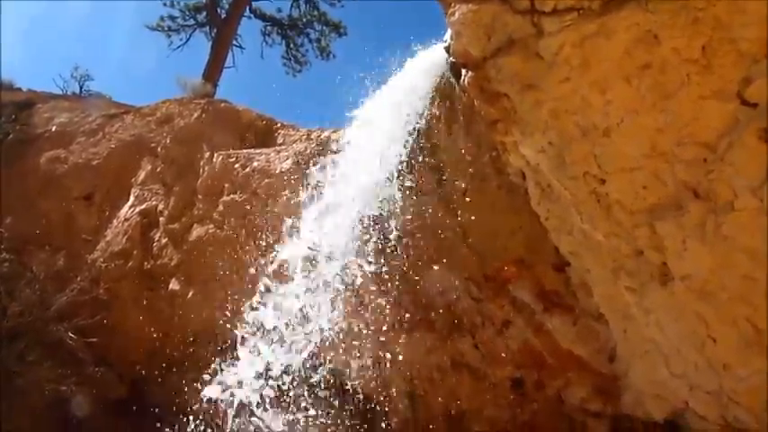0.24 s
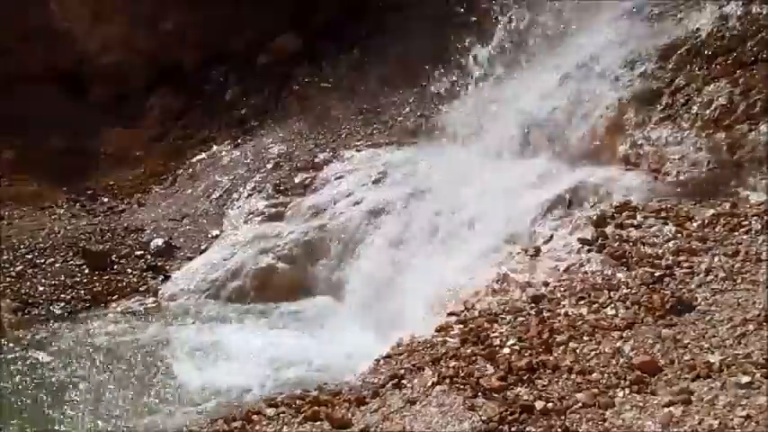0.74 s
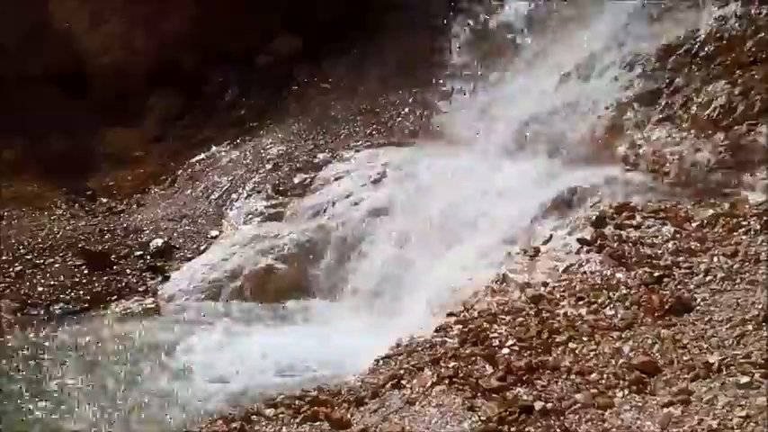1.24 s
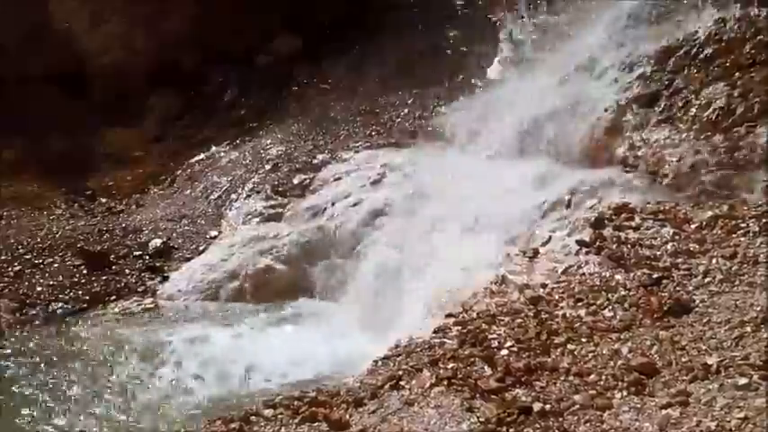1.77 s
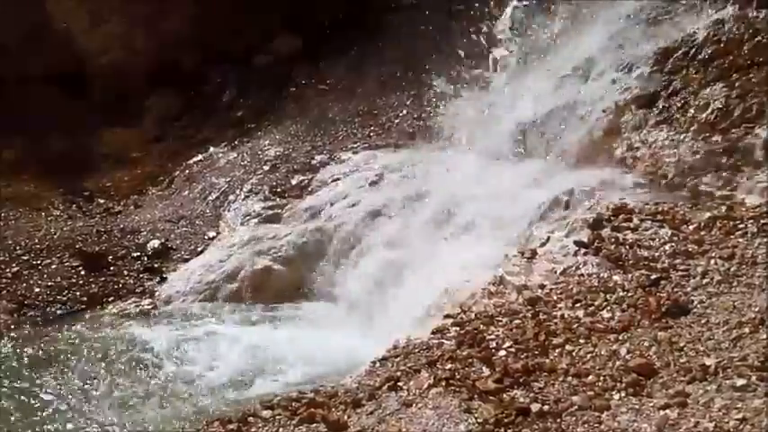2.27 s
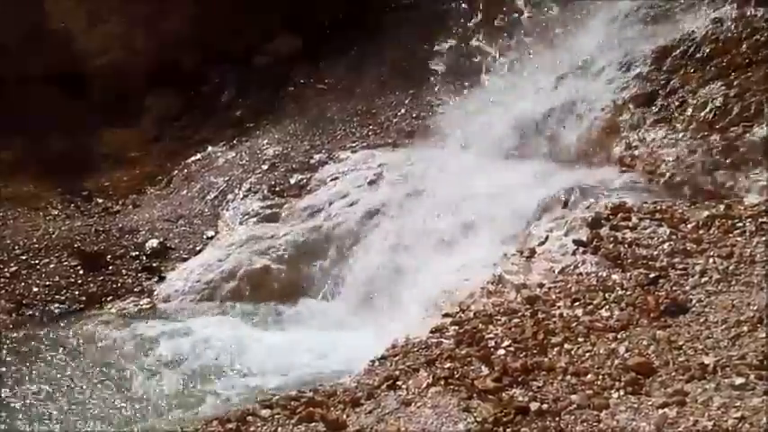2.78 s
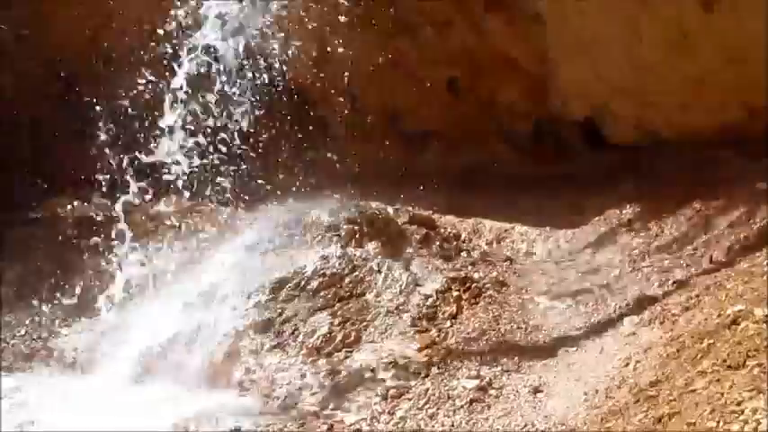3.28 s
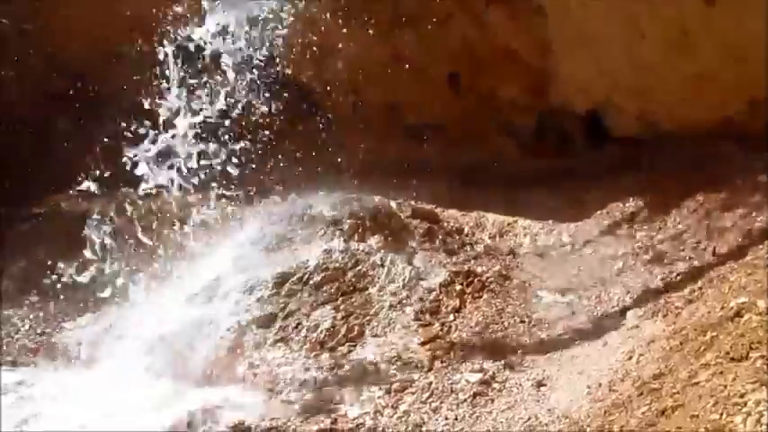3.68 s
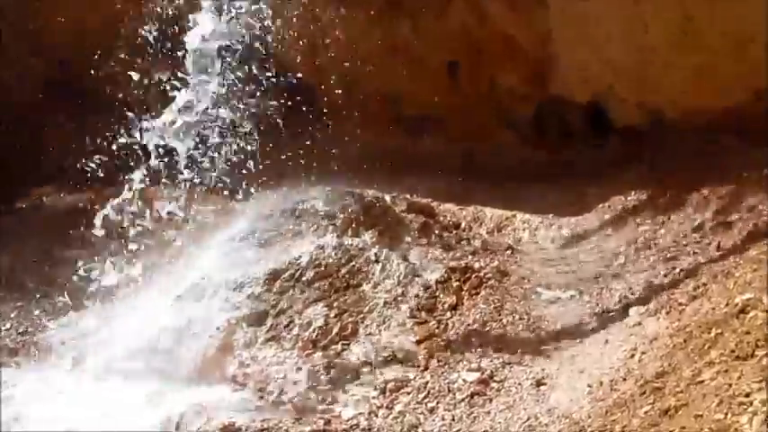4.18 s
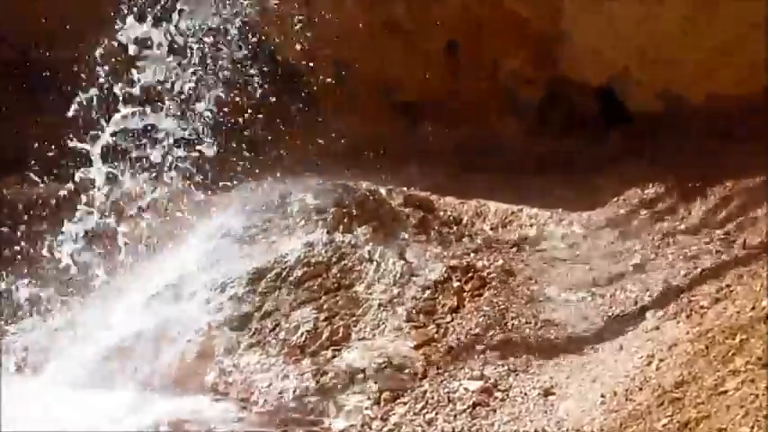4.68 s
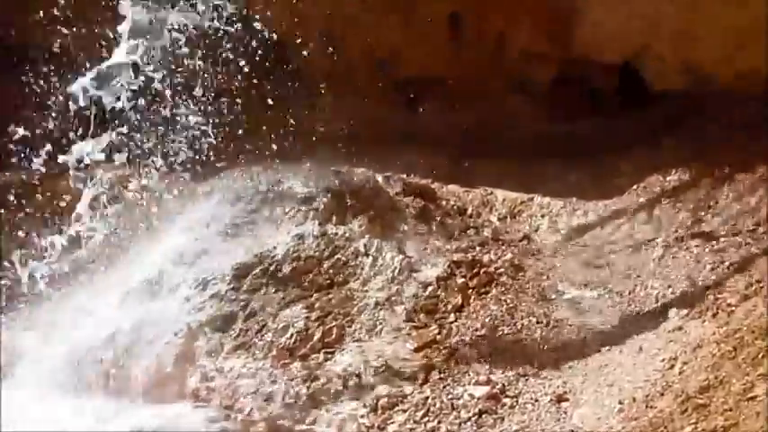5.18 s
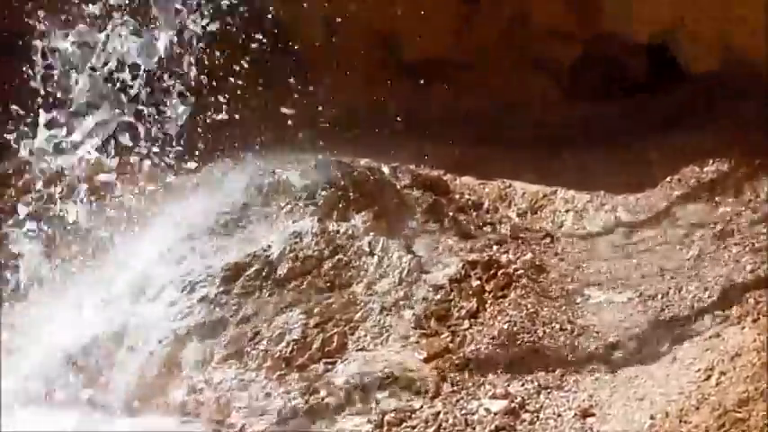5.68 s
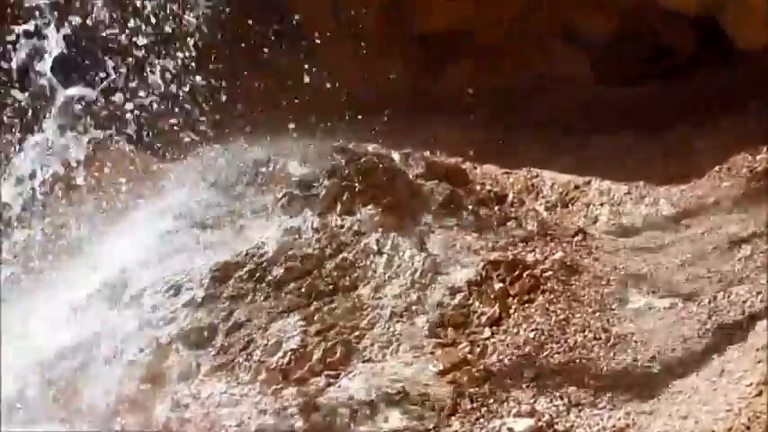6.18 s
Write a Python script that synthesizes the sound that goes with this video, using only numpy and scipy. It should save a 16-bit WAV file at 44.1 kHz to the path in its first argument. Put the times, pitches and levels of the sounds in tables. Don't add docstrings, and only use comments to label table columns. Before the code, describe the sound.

From 0 to 0.47 s, water pours off a rock ledge with a rough, patchy roar, wind thudding low on the microphone. It cuts to complete silence until about 0.65 s. Then a second close position bursts in: bright, hissing water rushing down gravel into a pool, with quick surges and dips. Wind buffets in short low puffs, stronger at left, and from about 1 s fat drops smack stone with short wet plips, joined by a few spray ticks after 2 s. At 3.08 s it stops abruptly, silent until 3.25 s. The third position is sheltered, with no wind: a fuller, mid-heavy splashing, less airy, swelling at the start and again near 5.55 s. Irregular drop slaps come several times a second, with sharp little clicks to either side, a bright one around 5.2 s. The rush continues steadily to the end at 6.44 s, without fading.

```python
import sys
import numpy as np
from scipy import signal
from scipy.fft import rfft, irfft, next_fast_len
from scipy.io import wavfile
from scipy.ndimage import uniform_filter1d

SR = 44100
rng = np.random.default_rng(int(sys.argv[2]) if len(sys.argv) > 2 else 0)


def master(y):
    cut = np.clip(np.atleast_2d(y).T, -1, 1)
    pcm = np.round(cut * 32767)
    wavfile.write(sys.argv[1], SR, pcm.astype(np.int16))


def undo_db(level):
    steps = np.asarray(level, float) / 20
    return 10 ** steps


N = 283563

# start in seconds, end in seconds, notch depth [0-1].
SPOTS = [
    (0, .4695, .9),
    (.6462, 3.0838, .9),
    (3.2497, 6.44, 0),
]
# time in seconds, flow in dB.
FLOW = [(0, 0), (.25, .5), (.46, 0), (.66, 2), (.78, -0.5), (.9, 1), (1.06, -.5), (1.3, -1), (1.55, .5),
        (2.0, 0), (2.5, 0), (3.06, -1.5), (3.26, 1.5), (3.75, 1.5), (4.15, -1), (4.7, 1), (5.8, -.5),
        (6.43, 1)]
# time in seconds, gain in dB,
# landing [-1 pool, 0 rock, 1 thin spray].
SLUGS = [(.16, -1.5, -1), (.25, 3, -0.17), (.44, 3, -1), (.665, 3.5, 1.1), (.85, 3.5, -.7), (1.26, -4, .4),
         (1.38, 0.5, -.8), (1.47, 2.5, -0.12), (2.04, -4, -0.53), (2.38, -3, 1), (2.5, 1.5, -1),
         (2.59, -5.5, -0.85), (2.65, 0.5, 0), (2.78, 3.5, 0.57), (2.86, -2.5, -.5), (2.91, 3, -0.15),
         (3.42, 4.5, -1.4), (3.81, -3.5, -0.79), (3.9, 2, 0.48), (4.1, -3.5, -.4), (4.14, 2.5, -.8),
         (5.04, 1.5, -1.1), (5.33, 0.5, 0.58), (5.41, -2.5, -0.44), (5.55, 5.5, -1), (5.62, 2.5, 0.39),
         (5.83, 2, 0.24), (5.87, -1.5, 0), (6.09, 3.5, 0.63), (6.37, 2, -0.73)]
FLOW_SHARES = (0.9, 0.78, 1)
# splash in dB, plunge in dB, spray in dB.
FALLS_DB = [
    (-21.5, -30, -27.5),
    (-22, -30, -26),
    (-22.5, -29.5, -28.5),
]
# frequency in Hz, density in dB per Hz.
WATER_SPECTRA = [
    [(24, -57.5), (40, -33), (188, -11.5), (302, -14.5), (369, -11), (724, -7.5), (800, -6.5), (1030, -7),
     (2650, -5.5), (4050, -8), (9240, -19), (15600, -34)],
    [(24, -59.5), (40, -39), (218, -15), (342, -20.5), (564, -9.5), (742, -11), (1820, -4), (2860, -3.5),
     (5470, -8.5), (6040, -9.5), (7200, -10.5), (7950, -13), (9470, -15), (14500, -27), (15600, -31)],
    [(18, -65), (30, -39), (114, -18), (144, -20.5), (173, -12.5), (237, -13), (400, -14), (577, -7),
     (900, -8), (1370, -4), (2080, -1.5), (3420, -4), (5340, -14), (7900, -11.5), (15600, -28)],
]
# frequency in Hz, left minus right in dB.
PORT_TILTS = [
    [(500, 0), (700, 0.7), (1290, .1), (2380, -3), (4400, -2.5), (8120, 0.5), (15000, -1.5)],
    [(500, -0.2), (770, .6), (1790, -1.5), (2740, -3), (4190, -4), (6410, -1), (9810, -3), (15000, -1.1)],
    [(500, 0.3), (770, 1.3), (1790, -1.1), (2740, -2.1), (4190, .6), (6410, .1), (9810, -1), (15000, .6)],
]
# frequency in Hz, likeness [0-1], left port's lead in radians.
PORT_COHERENCE = [
    [(300, .95, 0), (1500, .88, 0), (2700, .66, 0), (4300, .35, .7), (7000, .22, 2.4), (10000, .45, 3),
     (15000, .2, 5.5)],
    [(300, .96, -.1), (1500, .87, -.45), (3500, .76, -.85), (5000, .64, -1.05), (9000, .52, -2),
     (12000, .42, -2.5), (15500, .33, -3.1)],
    [(300, .96, 0), (1300, .9, .1), (2000, .78, .2), (3700, .46, .9), (4300, .4, .5), (5800, .24, .8),
     (6800, .4, .7), (8200, .3, 2), (10000, .4, 2.8), (12500, .25, 3.2), (15500, .16, 4.2)],
]
# centre in Hz, width in Hz.
NOTCHES = [
    (5940, 110),
    (7850, 170),
]
# time in seconds, level in dB, hold in seconds, brightness in dB.
GUSTS = [(.005, -41, .005, 3.5), (0.195, -34.5, .005, 4.5), (.33, -46.5, .04, -5.5),
         (0.412, -40.5, .01, -6), (0.707, -46, 1.3, 2.5), (0.755, -34, .005, 3), (0.857, -35, .005, 5.5),
         (.97, -41, .02, -3), (1.079, -44, .08, 3.5), (1.274, -43.5, .02, 2), (1.382, -35.5, .01, 2),
         (1.46, -40.5, .05, -5.5), (1.562, -34, .005, 7), (1.656, -36.5, .005, 1),
         (1.787, -44.5, .02, -3.5), (1.86, -40, .02, 5.5), (1.954, -37.5, .01, 4.5), (2.04, -45, .005, 4.5),
         (2.129, -47, .005, -0.5), (2.23, -44.5, .18, -8.5), (2.841, -41, .01, -13), (2.95, -45.5, .05, -3),
         (3.045, -43, .01, -3)]
BREEZE_DB = (-50, -54.5)
LEAN_PER_DB = (0.3, 0.88)
# frequency in Hz, density in dB per Hz.
WIND_SPECTRUM = [(25, -16), (60, -0.5), (120, 0), (250, -8.5), (400, -10.5), (700, -27)]
# time in seconds, peak in dB, pitch in Hz.
SMACKS = [(0.96, -10, 3580), (0.9901, -11, 2380), (1.206, -11, 1797), (1.8252, -8, 2094), (1.914, -6, 2870),
          (2.0682, -8, 4090), (2.2025, -5, 2300), (2.3575, -5.5, 1954), (2.4039, -15, 2810),
          (2.5765, -12, 2490), (2.6086, -2.5, 3180), (2.904, -15.5, 2540), (3.0517, -10, 1990),
          (3.257, -10, 2490), (3.432, -9.5, 2300), (3.581, -9.5, 1390), (3.7495, -7.5, 1970),
          (3.9, -5, 2040), (4.029, -7, 2080), (4.125, -14, 2250), (4.4667, -3.5, 2760),
          (4.6556, -7.5, 2520), (4.7371, -7.5, 2680), (4.9057, -20, 1840), (5.2135, -10, 2350),
          (5.3312, -7.5, 2920), (5.6237, -3.5, 2180), (5.8315, -4.5, 1790), (6.2227, -11, 1470),
          (6.3596, -7.5, 1840)]
# time in seconds, peak in dB, left minus right in dB.
TICKS = [(2.0677, -11, -5), (2.7536, -9, 1), (2.7836, -9.5, 0), (3.247, -11.5, 1), (3.4357, -10.5, -2),
         (4.007, -8, -2.5), (4.197, -8.5, -4.5), (4.4163, -12, -2), (4.8307, -16.5, 4), (5.219, -5.5, 5.5),
         (5.5797, -13.5, 3), (5.884, -15, -4.5)]


def rms_one(x):
    return x / np.sqrt(np.mean(x ** 2) + 1e-20)


def in_time(rows):
    s, *columns = np.transpose(rows)
    return [np.interp(np.arange(N) / SR, s, c) for c in columns]


def at_hz(points, hz):
    points_hz, values = np.transpose(points)
    return np.interp(np.log(hz), np.log(points_hz), values)


def drift(rate):
    step = 20
    r = np.exp(-2 * np.pi * step * rate / SR)
    noise = rng.standard_normal(N // step + 4002)
    slow = signal.lfilter([1], [1, -2 * r, r * r], noise)[4000:]
    return np.interp(np.arange(N) / step, np.arange(len(slow)), rms_one(slow))


def band(x, low_hz, high_hz):
    return signal.sosfilt(signal.butter(2, [low_hz, high_hz], "band", fs=SR, output="sos"), x)


def flow():
    churn_db, churn_per_s = (0.2, .5, 0.38), 14
    half_s, spread = 0.019, 1
    t = np.arange(N) / SR
    landings = np.array([[0], [-1], [1]])
    out = np.outer(FLOW_SHARES, in_time(FLOW)) + [db * drift(churn_per_s) for db in churn_db]
    for s, gain_db, landing in SLUGS:
        near = slice(*np.searchsorted(t, [s - 3 * half_s, s + 3 * half_s]))
        aim = ((landings - landing) / spread) ** 2
        passing = ((t[near] - s) / half_s) ** 2
        out[:, near] += gain_db * np.exp(-aim - passing)
    return out


def drops(per_cycle, size_db, share, echo_share, patchy_db, surge_db):
    out, surge, neighbour = np.zeros((3, N)), drift(12), drift(14)
    edges = 24 * 2 ** np.arange(0, 9.6, .5)
    shares = np.clip([[share], [echo_share], [echo_share]], 0, 1)
    white = rng.standard_normal((2, 3, N))
    chance = rng.random(N)
    sizes_db = size_db * np.minimum(rng.exponential(1, N), 4)
    sizes = undo_db(sizes_db) * rng.choice([-1, 1], N)
    for k, (low, high) in enumerate(zip(edges, edges[1:])):
        hits = rms_one(sizes * (chance < per_cycle * low / SR))
        hits = np.roll(hits, k * N // 23)
        echoed = [hits, np.roll(hits, N // 3), np.roll(hits, -N // 3)]
        mist = np.sqrt(1 - shares) * white[k % 2] + np.sqrt(shares) * echoed
        own = drift(17)
        out += band(mist, low, high) * undo_db(surge_db * surge + patchy_db * (own + neighbour))
        neighbour = own
    return out


def heard_from(streams, notch, colour, tilt, pair):
    size = next_fast_len(N)
    hz = np.maximum(np.fft.rfftfreq(size, 1 / SR), 1)
    direct, left, right = rfft(streams, size)
    at, likeness, lead = np.transpose(pair)
    alike = np.interp(hz, at, likeness)
    turn = np.interp(hz, at, lead) / 2
    gain = undo_db(at_hz(colour, hz)) / np.sqrt(1 + alike * np.cos(2 * turn))
    for notch_hz, width_hz in NOTCHES:
        gain = gain * (1 - np.clip(notch, 0, 1) / (1 + (2 * (hz - notch_hz) / width_hz) ** 2))
    lean = undo_db(at_hz(tilt, np.maximum(hz, 500)) / 2)
    shared, apart = np.sqrt(alike) * direct, np.sqrt(1 - alike)
    left_port = lean * (shared * np.exp(1j * turn) + apart * left)
    right_port = (shared * np.exp(-1j * turn) + apart * right) / lean
    spectra = gain * np.array([left_port, right_port])
    ranges = ((hz >= 1400) & (hz < 4500), hz < 1400, hz >= 4500)
    parts = np.array([irfft(spectra * pick, size)[:, :N] for pick in ranges])
    heard = parts.mean(axis=1)
    heard[1] = band(heard[1], 350, 1600)
    return parts / np.sqrt(np.mean(heard ** 2, axis=1))[:, None, None]


def falls():
    t, levels = np.arange(N) / SR, flow()
    streams = drops(per_cycle=.06, size_db=3.0, share=0.18, echo_share=0.3, patchy_db=0.36, surge_db=0.01)
    out = np.zeros((2, N))
    starts = [spot[0] for spot in SPOTS] + [np.inf]
    for k, spot in enumerate(SPOTS):
        here = (t >= starts[k]) & (t < starts[k + 1])
        gains = undo_db(levels + np.c_[list(FALLS_DB[k])])
        parts = heard_from(streams, spot[2], WATER_SPECTRA[k], PORT_TILTS[k], PORT_COHERENCE[k])
        out += here * np.sum(gains[:, None] * parts, axis=0)
    return out


def gusts():
    rise_db_per_s, fall_db_per_s = 417.5, 302.5
    t = np.arange(N) / SR
    spot = (t > SPOTS[1][0]).astype(int)
    breeze_db = np.array(BREEZE_DB)[spot]
    level_db, bright_db = breeze_db.copy(), np.zeros(N)
    for s, peak_db, hold_s, sharp_db in GUSTS:
        below_db = np.maximum(rise_db_per_s * (s - t), fall_db_per_s * (t - s - hold_s))
        gust_db = peak_db - np.maximum(0, below_db)
        bright_db = np.where(gust_db > level_db, sharp_db, bright_db)
        level_db = np.maximum(level_db, gust_db)
    lean_db = np.array(LEAN_PER_DB)[spot] * (level_db - breeze_db)
    return level_db, lean_db, uniform_filter1d(bright_db, size=900)


def wind():
    level_db, lean_db, bright_db = gusts()
    hz = np.maximum(np.fft.rfftfreq(N, 1 / SR), 1)
    spectrum = rfft(rng.standard_normal((2, N))) * undo_db(at_hz(WIND_SPECTRUM, hz))
    rumble = rms_one(irfft(spectrum, N))
    rumble = rumble + (undo_db(bright_db) - 1) * band(rumble, 140, 900)
    rumble = rumble / np.sqrt(uniform_filter1d(rumble ** 2, size=2600))
    lumps = undo_db(1.9 * np.array([drift(25), drift(23)]))
    blowing = np.arange(N) / SR < SPOTS[2][0]
    return blowing * rumble * lumps * undo_db(level_db + 3.0 + np.outer([.6, -.6], lean_db))


def smacks():
    out, t = np.zeros(N + 400), np.arange(400) / SR
    for s, peak_db, hz in SMACKS:
        i = round(s * SR)
        decay = undo_db(-60 * t * hz / 10.6)
        out[i:i + 400] += undo_db(peak_db + 0.5) * np.sin(2 * np.pi * hz * t) * decay
    return band(out[:N], 600, 12000)


def ticks():
    s, peak_db, lean_db = np.transpose(TICKS)
    clicks = np.full((2, N), 1e-18)
    clicks[:, np.round(s * SR).astype(int)] = undo_db(peak_db + 5.0 + np.outer([.5, -.5], lean_db))
    return band(clicks, 2200, 11000)


def scene():
    return falls() + wind() + smacks() + ticks()


def band_limit(x):
    return signal.sosfilt(signal.butter(12, 15800, fs=SR, output="sos"), x)


def record(dry):
    fade_s = .0015
    t = np.arange(N) / SR
    heard = sum((t >= start) * np.clip((end - t) / fade_s + .5, 0, 1) for start, end, notch in SPOTS)
    low_pass = signal.cheby2(12, 60, 17000, fs=SR, output="sos")
    mix = signal.sosfilt(low_pass, dry * heard + 1e-18)
    return band_limit(mix)


dry = scene()
out = record(dry)
master(out)
```